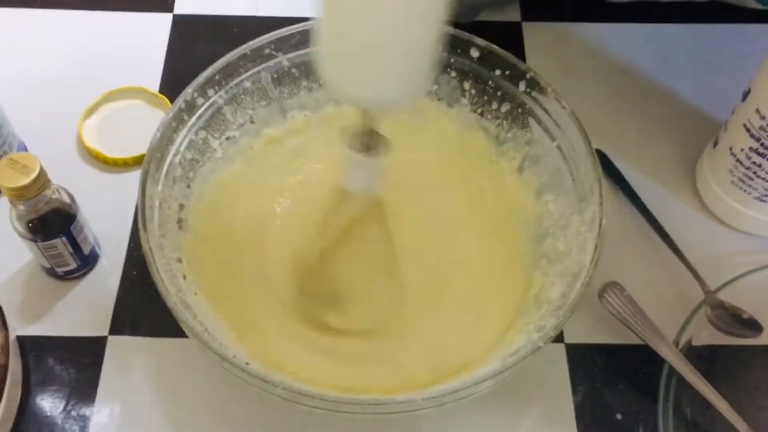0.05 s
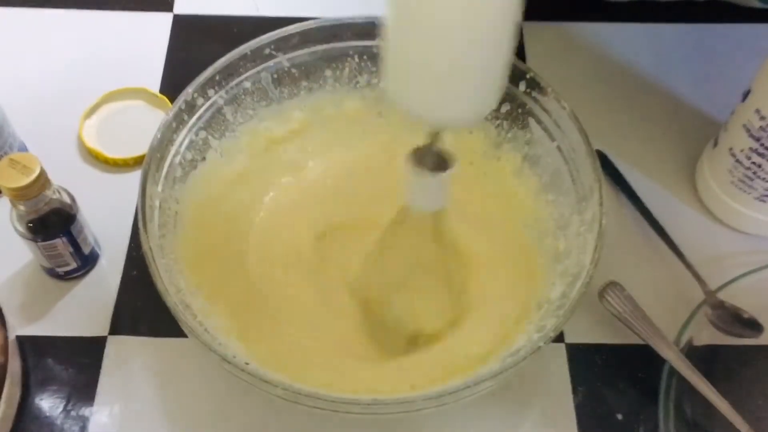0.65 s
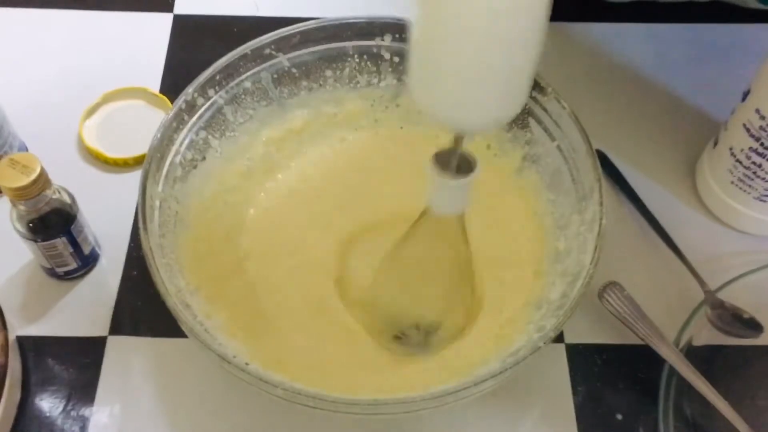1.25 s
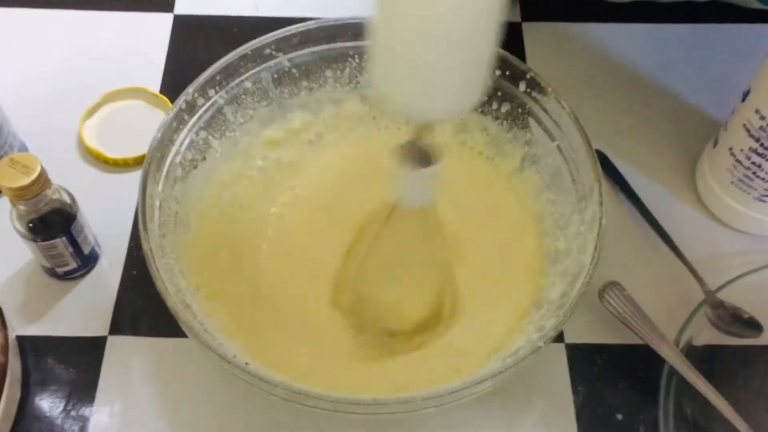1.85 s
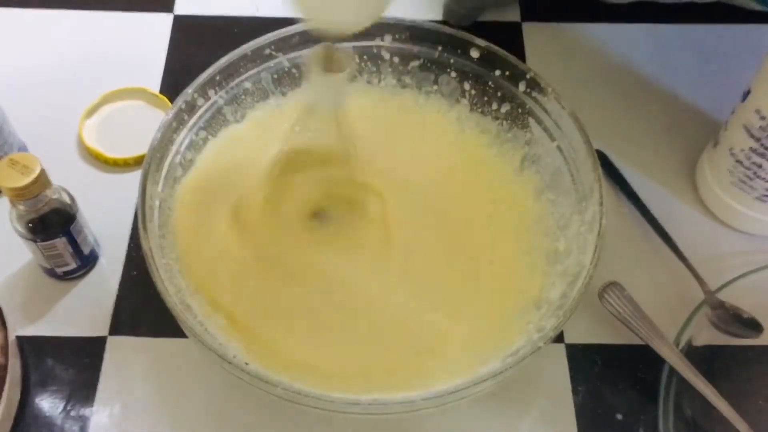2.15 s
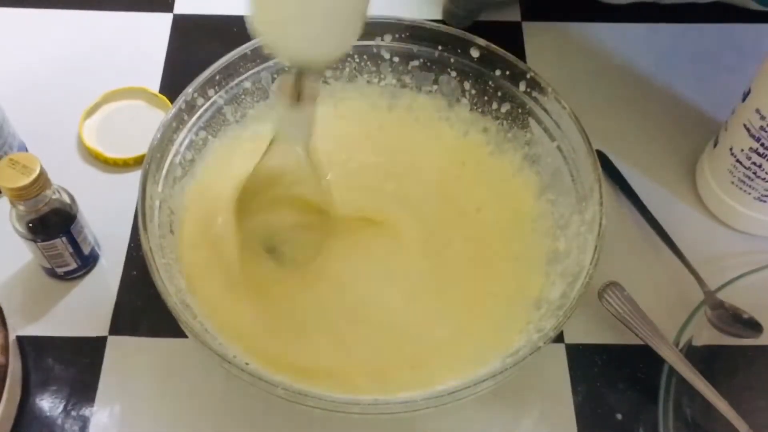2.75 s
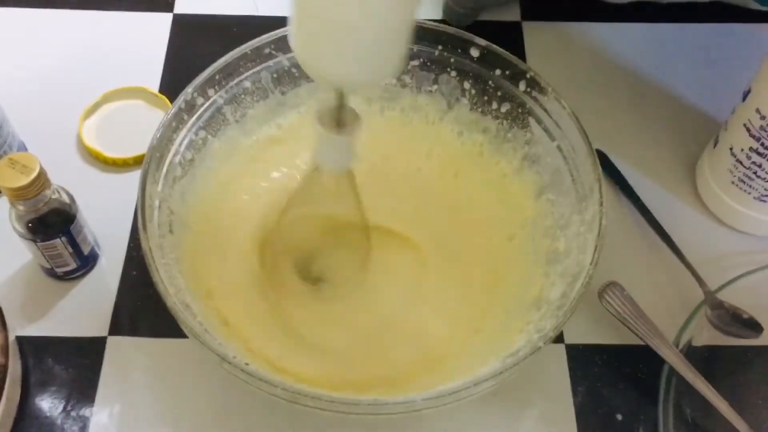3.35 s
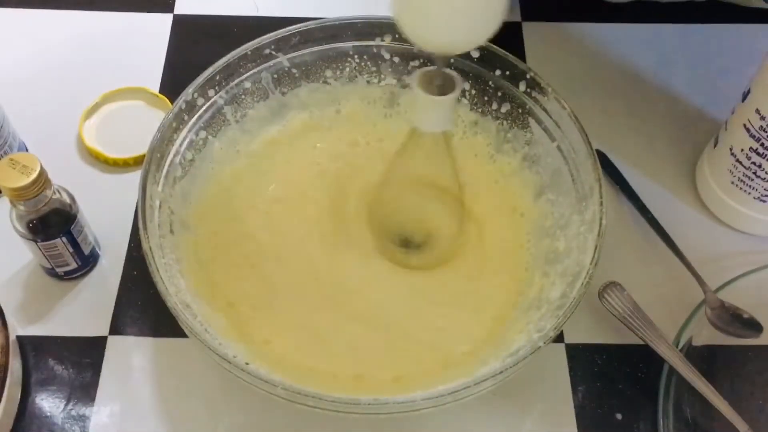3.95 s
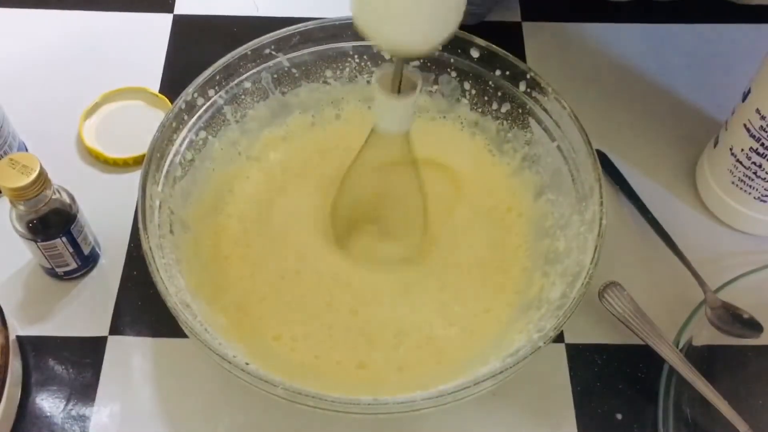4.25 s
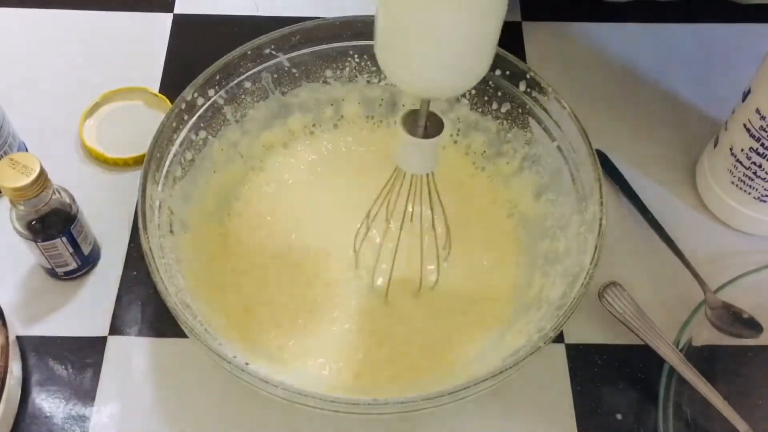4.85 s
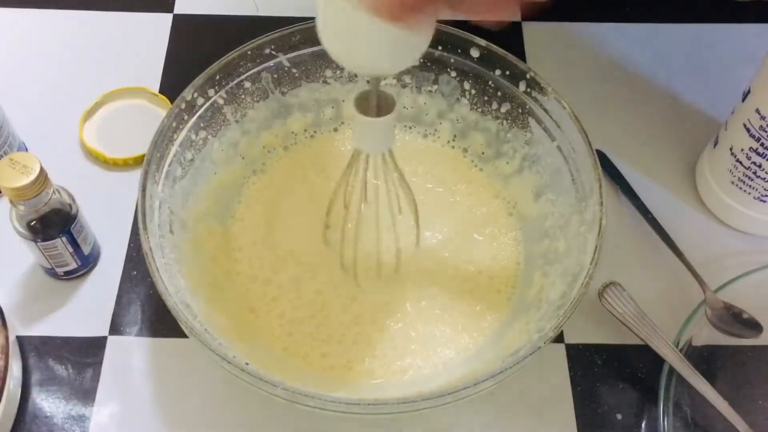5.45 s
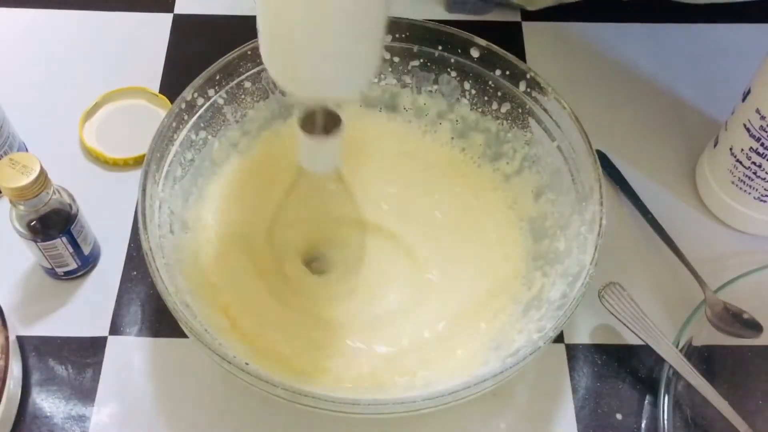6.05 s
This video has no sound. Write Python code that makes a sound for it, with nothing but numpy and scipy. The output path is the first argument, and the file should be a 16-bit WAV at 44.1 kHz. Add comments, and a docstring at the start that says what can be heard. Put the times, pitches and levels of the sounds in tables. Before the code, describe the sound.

Close up in a small kitchen with hard walls, a handheld electric whisk beats batter with a buzzing, rattling whine that wavers as it is stirred around. The bowl rumbles softly underneath. The whisk slows with a falling, shuddering whine and stops, leaving a low hum and barely audible froth. With a sharp click it jumps back to full speed, and a wire squeaks briefly against the glass.

```python
"""On a kitchen counter, a hand blender spins a balloon whisk in a bowl of batter, stops and restarts.
Its reduction gear whines at the tooth rate and its octave, while the impacts of uneven teeth drive
the resonances of the plastic housing, in nearly the same pattern on every whisk turn.
Churned batter shakes the bowl, froth crackles, and the wires click and squeak against the glass.
A mains hum fills the pause, and the small hard room reverberates."""
import sys
import numpy as np
from scipy import signal
from scipy.fft import rfft, irfft, next_fast_len
from scipy.io import wavfile

SR = 44100
rng = np.random.default_rng(int(sys.argv[2]) if len(sys.argv) > 2 else 0)


def store_wav(level_fs):
    """Save 16-bit WAV to argv[1]."""
    pcm = np.round(np.clip(np.atleast_2d(level_fs), -1, 1) * 32767)
    wavfile.write(sys.argv[1], SR, pcm.T.astype(np.int16))


N = 273861
TAPS, TOP_HZ = 2048, 15750
TIME = np.arange(N) / SR
FREQ = np.arange(TAPS + 1) * SR / (2 * TAPS)
HUM_HZ = 58.25
TEETH, RUN_TURNS_PER_S = 143, 17.99
OFF_S, COAST_S = 4.178, .485
ON_S, SPIN_UP_S, SPIN_UP_SHAPE = 5.486, .0275, .87
STROKE_S, OCTAVE_LAG_S = .25, .09
RAISED_S, RAISED_LENGTH_S = 3.9, .42  # half out of the batter, the whisk rattles more brightly

# Spectrum of the still kitchen air: frequency_hz, gain_db
AIR_SPECTRUM = [(30, -3), (160, -3.5), (280, -6), (600, -9), (1000, -10.5), (1500, -15), (2200, -14),
                (3000, -23.5), (7000, -32.5), (15000, -46.5)]
# Swelling and sinking of the mains hum, in relative levels: time_s, fundamental_db, octave_db
HUM_ENVELOPE = [(.3, -50, -45.5), (1.4, -43, -45), (2.2, -42, -48), (2.7, -47.5, -41.5), (4.8, -48, -42.5),
                (5.35, -41.5, -45.5), (6.2, -45, -40.5)]
# Faint upper tones of the hum: pitch_hz, relative_db
HUM_PARTIALS = [(232, -63), (366, -66.5)]
# Spectrum of the shaken bowl and counter: frequency_hz, gain_db
BOWL_SPECTRUM = [(20, -36), (45, -17), (65, -14), (100, -.5), (122, -5.5), (155, -29), (300, -33.5),
                 (900, -68)]
# Batter slopping against the bowl: peak_s, relative_db, length_s
BATTER_SLOPS = [(.13, -37.5, 0.12), (.6, -41, 0.4), (1.23, -37.5, 0.22), (1.64, -42, .12), (1.9, -38.5, .2),
                (2.42, -41, .14), (2.91, -39.5, .12), (3.15, -48, .2), (3.47, -42, .13), (3.95, -44.5, .12),
                (4.8, -52, .07)]
# Flurries of froth round the resting whisk: peak_s, level_db, length_s
FROTH_FLURRIES = [(5.035, -70, 0.035), (5.19, -69, 0.049), (5.31, -71, 0.064)]
# A wire grazing the glass: peak_s, pitch_hz, level_db, length_s
WIRE_GRAZES = [(4.39, 4150, -26, 0.011), (6.035, 8560, -21, 0.016)]
# Knocks of the wires, the switch and gears taking up slack: start_s, level_db, ring_hz, decay_s
IMPACTS = [(4.768, -54, 9500, .007), (4.936, -57, 3300, .004), (5.281, -54, 3000, .004),
           (5.483, -24.5, 2760, 0.006), (5.495, -25, 930, 0.0039)]
# Thin whirr as the whisk is raised: time_s, level_db
WHIRR_ENVELOPE = [(3.3, -60), (3.65, -37), (4.05, -30), (4.25, -40.5), (4.5, -52), (4.6, -100)]
# Broad response of the plastic housing: frequency_hz, gain_db
HOUSING_SPECTRUM = [(120, -20), (330, -23), (450, -12), (550, -10.5), (660, -5), (850, -7), (1000, -8),
                    (1400, -7), (1700, -0.5), (3000, -6), (4500, -3.5), (6200, -4), (9000, -2),
                    (10200, -9.5), (13000, -16), (15500, -21.5)]
# Resonances of the housing: centre_hz, width_hz, lift_db
HOUSING_MODES = [(222, 29, 8.5), (1188, 200, 4), (1964, 304, 9.5), (2317, 340, 10.5), (2690, 220, 4.5),
                 (3460, 1120, 6), (5277, 690, 5.5), (6880, 210, 4), (8386, 680, 5)]
# Stirring strokes that press the gears: peak_s, pressure_fraction, octave_lift_db
STIR_STROKES = [(.03, 0.8, 2.5), (.54, 0.8, 4), (1.08, 0.99, 4), (1.67, 0.83, 2), (2.22, .9, 0.5),
                (2.81, 0.97, 3), (3.34, 0.8, 3.5), (4.12, 0.65, -1.5), (5.68, 0.7, -1), (5.98, 0.8, 1.5)]
# Shudders of the shaft as speed changes: peak_s, length_s, rattle_lift_db, tone_lift_db, octave_lift_db
SHAFT_SHUDDERS = [(4.23, 0.052, -0.5, 3, -1), (4.281, .04, 2.5, -1, 9), (4.366, 0.048, 0.5, 6, 11),
                  (4.452, 0.042, 5, 16, 14.5), (4.495, 0.036, 5, 2.5, -3), (4.53, 0.076, 2.5, 10.5, 14.5),
                  (4.598, 0.045, 2.5, -4, 9), (5.497, .01, 1.5, 9, 2), (5.518, 0.016, 0, 7.5, 7.5)]
# Tones of the uneven gear wheel: cycles_per_turn, relative_db
WHEEL_ORDERS = [(24, -61), (26, -57.5), (37, -54), (47, -53), (49, -53.5), (108, -41), (111, -42),
                (122, -40.5), (129, -44), (133, -35.5), (156, -44.5)]
# Overtones of the unloaded gears and motor: tooth_rate_multiple, relative_db
FREE_OVERTONES = [(3, -5.5), (4.2, -13), (6.4, -14), (8.5, -18), (10.6, -17), (12.7, -19)]


def undb(db):
    """Amplitude ratio of a level in decibels."""
    return 10 ** (np.asarray(db) / 20)


def unit(x):
    """Normalisation to rms 1."""
    return x / np.sqrt(np.mean(x ** 2))


def curve(rows, column=1):
    """Linear interpolation of one table column over time."""
    rows = np.asarray(rows)
    return np.interp(TIME, rows[:, 0], rows[:, column])


def swell(peak_s, length_s):
    """Gaussian envelope of height 1, above one half for length_s."""
    return .5 ** ((2 * (TIME - peak_s) / length_s) ** 2)


def swells(rows):
    """Superposition of Gaussian envelopes: peak_s, level_db, length_s."""
    return sum(undb(db) * swell(peak_s, length_s) for peak_s, db, length_s in rows)


def walk(rate_hz):
    """Band-limited random fluctuation of rms 1, with about rate_hz new values a second."""
    steps = rng.standard_normal(N // 32)[:int(rate_hz * N / SR) + 4]
    smooth = signal.resample_poly(steps, 8, 1)
    return unit(np.interp(TIME * rate_hz * 8, np.arange(len(smooth)), smooth))


def per_turn(turns, count):
    """Periodic modulation: count harmonics of the rotation, complex, with a real part of rms 1."""
    harmonics = np.exp(2j * np.pi * rng.random(count))
    profile = signal.hilbert(unit(irfft(np.r_[0, harmonics], TAPS)))
    return profile[(turns * TAPS).astype(int) % TAPS]


def spectrum(points):
    """Frequency response in dB, interpolated on a logarithmic frequency axis."""
    hz, db = np.transpose(points)
    return np.interp(np.log(FREQ + 1), np.log(hz), db)


def colour(x, db):
    """Minimum-phase filtering with the given response in dB."""
    cepstrum = irfft(db * np.log(10) / 20)
    cepstrum[1:TAPS] *= 2
    cepstrum[TAPS + 1:] = 0
    impulse_response = irfft(np.exp(rfft(cepstrum)))[:TAPS]
    return signal.oaconvolve(x, impulse_response)[:len(x)]


def lowpass(x, hz):
    """First-order low-pass filtering."""
    return signal.lfilter(*signal.butter(1, hz, fs=SR), x)


def background(waver_db=1.45, drift_rad=.3, hum_lift_db=.5, air_db=-53):
    """Superposition: mains hum, wavering in level and phase, over the broadband noise of the air."""
    tones = [(HUM_HZ, curve(HUM_ENVELOPE)), (2 * HUM_HZ, curve(HUM_ENVELOPE, column=2))] + HUM_PARTIALS
    hum = 0
    for hz, db in tones:
        amplitude = np.sqrt(2) * undb(db + hum_lift_db + waver_db * walk(3.5))
        hum += amplitude * np.sin(2 * np.pi * hz * TIME + drift_rad * walk(1.6))
    air = unit(colour(rng.standard_normal(N), spectrum(AIR_SPECTRUM)))
    return hum + air * undb(air_db + .7 * walk(2.9))


def room(x, wet_db=-8, low_t60_s=.69, high_t60_s=.38, split_hz=3000, onset_s=.0095):
    """Reverberation: hard walls return a dense, exponentially decaying tail whose treble dies first."""
    age = TIME[:SR // 2]
    noise = rng.standard_normal(len(age))
    low = lowpass(noise, split_hz)
    tail = low * undb(-60 * age / low_t60_s) + (noise - low) * undb(-60 * age / high_t60_s)
    tail = unit(tail * np.clip(age / onset_s, 0, 1)) / np.sqrt(len(age))
    return x + undb(wet_db) * signal.oaconvolve(x, tail)[:N]


def bowl(slop_lift_db=2.5, steady_db=-54):
    """Forced vibration: churned batter shakes bowl and counter; steady rumble and slops add in power."""
    rumble = unit(colour(rng.standard_normal(N), spectrum(BOWL_SPECTRUM)))
    return rumble * np.hypot(undb(steady_db), undb(slop_lift_db) * swells(BATTER_SLOPS))


def froth(pops_per_s=2500, spread_db=2, highpass_hz=2500, steady_db=-76):
    """Shot noise: tiny air bubbles burst independently on the batter and merge into a soft crackle."""
    pops = (rng.random(N) < pops_per_s / SR) * undb(spread_db * rng.standard_normal(N))
    return unit(pops - lowpass(pops, highpass_hz)) * (undb(steady_db) + swells(FROTH_FLURRIES))


def grazes():
    """Frictional excitation: a wire grazing the glass sings a brief pure tone."""
    return sum(np.sqrt(2) * undb(db) * swell(peak_s, length_s) * np.sin(2 * np.pi * hz * TIME)
               for peak_s, hz, db, length_s in WIRE_GRAZES)


def clicks(half_width_octaves=.99):
    """Impact excitation: each hard contact is a burst that decays in a broad, damped resonance."""
    out = np.zeros(N)
    for start_s, db, hz, decay_s in IMPACTS:
        detuning = np.log2((FREQ + 1) / hz) / half_width_octaves
        ring = unit(colour(rng.standard_normal(TAPS), -10 * np.log10(1 + detuning ** 4)))
        first = int(start_s * SR)
        out[first:first + TAPS] += undb(db) * ring * np.exp(-TIME[:TAPS] / decay_s)
    return out


def whirr(centre_hz=6900, width_hz=330):
    """Narrow-band noise, heard as a thin high whirr while the whisk is raised."""
    band_db = -10 * np.log10(1 + (2 * (FREQ - centre_hz) / width_hz) ** 4)
    return unit(colour(rng.standard_normal(N), band_db)) * undb(curve(WHIRR_ENVELOPE))


def motor_speed(wander=.001602, wander_hz=4):
    """Whisk turns per second: friction slows the idle motor evenly; power brings it quickly back."""
    coast = np.clip(1 - (TIME - OFF_S) / COAST_S, 0, 1)
    run_up = 1 - np.exp(-(np.maximum(TIME - ON_S, 0) / SPIN_UP_S) ** SPIN_UP_SHAPE)
    return RUN_TURNS_PER_S * (coast + run_up) * (1 + wander * walk(wander_hz))


def tooth_force_db(speed, torque_db=13):
    """Contact force is proportional to speed; the motor's torque adds to it during acceleration."""
    share = np.maximum(speed / RUN_TURNS_PER_S, .01)
    return 20 * np.log10(share) + torque_db * (1 - share) * (TIME > ON_S)


def pressure():
    """Mechanical loading of the gears by the stirring hand, from 0 to 1."""
    return sum(press * swell(peak_s, STROKE_S) for peak_s, press, _ in STIR_STROKES)


def shudder_db(column):
    """Transient vibration of the whisk on its shaft shifts the level of one layer."""
    return sum(row[column] * swell(row[0], row[1]) for row in SHAFT_SHUDDERS)


def housing_db():
    """Frequency response of the housing: resonance peaks on a broad contour."""
    peaks = sum(db * .5 ** ((2 * (FREQ - hz) / width) ** 2) for hz, width, db in HOUSING_MODES)
    return spectrum(HOUSING_SPECTRUM) + peaks


def wheel_tones(turns, load, sway_rad=.8, sway_hz=8, flicker_db=3, press_db=2, gain_db=-2.5):
    """Rotational harmonics: the loaded, uneven wheel sounds wavering multiples of the turn rate."""
    tones = 0
    for order, db in WHEEL_ORDERS:
        amplitude = np.sqrt(2) * undb(db + flicker_db * walk(sway_hz))
        tones += amplitude * np.sin(2 * np.pi * order * turns + sway_rad * walk(sway_hz))
    return tones * load * undb(gain_db + press_db * pressure())


def tooth_knocks(turns, memory=.9, uneven_db=2, play_teeth=.3346, slip_teeth=.027):
    """Quasi-periodic impacts: each tooth's strength and offset drift slowly as the whisk is moved."""
    count = int(turns[-1] * TEETH)
    chance = rng.standard_normal((count // TEETH + 1, TEETH, 3))
    chance[1:] *= np.sqrt(1 - memory ** 2)
    pattern = signal.lfilter([1], [1, -memory], chance, axis=0)  # correlated from turn to turn
    offset, strength, flank = pattern.reshape(-1, 3)[:count].T
    place = np.arange(count) + play_teeth * offset + slip_teeth * rng.standard_normal(count)
    arrival = np.interp(place / TEETH, turns, np.arange(N))
    # backlash: a tooth lands on its front or its rear flank
    size = undb(uneven_db * strength) * np.tanh(2 * flank)
    # windowed sinc pulses place the knocks between samples
    taps = arrival.astype(int)[:, None] + np.arange(-5, 7)
    lag = taps - arrival[:, None]
    pulses = size[:, None] * np.sinc(lag) * np.cos(np.pi * lag / 12) ** 2
    return unit(np.bincount(taps.ravel() % N, pulses.ravel(), N))


def rattle(turns, speed, gain_db=-21.5, rub_db=-1, wobble_db=1.27,
           shelf_hz=5000, shelf_db=-1.5, press_db=2, slow_db=12, raised_db=1):
    """Source and filter: knocks and rubbing ring the housing; pressed or slow teeth sound duller."""
    force = tooth_knocks(turns) + undb(rub_db) * rng.standard_normal(N)
    # the whisk runs a little off centre and presses the gears unevenly
    force *= undb(wobble_db * per_turn(turns, count=6).real)
    body = unit(colour(force, housing_db()))
    lows = signal.sosfiltfilt(signal.butter(2, shelf_hz, fs=SR, output="sos"), body)
    bright_db = raised_db * swell(RAISED_S, RAISED_LENGTH_S)
    coast_db = slow_db * (1 - speed / RUN_TURNS_PER_S) ** 2 * (TIME < ON_S)
    lows_db = shelf_db + press_db * pressure() - bright_db + coast_db
    level_db = gain_db + tooth_force_db(speed) + bright_db + shudder_db(column=2)
    return (body + (undb(lows_db) - 1) * lows) * undb(level_db)


def tooth_tone(turns, speed, load, gain_db=-30, load_db=-8.5, press_db=6, body_share=.71,
               runout_rad=.32, flutter_rad=.45, flutter_hz=130, sway_rad=.96, sway_hz=9,
               throb_db=5.5, chatter_db=3, free_chatter_db=1.5, chatter_hz=90):
    """Gear-mesh tone: run-out modulates phase and level on every turn; backlash makes it chatter."""
    bend = runout_rad * per_turn(turns, count=11).real + flutter_rad * walk(flutter_hz)
    bend += sway_rad * walk(sway_hz)  # the hand carries the blender to and fro
    ripple_db = throb_db * load * per_turn(turns, count=3).real
    ripple_db += (chatter_db + free_chatter_db * (1 - load)) * walk(chatter_hz)
    # the tone swells as it glides through the resonances of the housing
    body_db = body_share * np.interp(TEETH * speed, FREQ, housing_db())
    loaded_db = load * (load_db + press_db * pressure())
    level_db = gain_db + tooth_force_db(speed) + body_db + loaded_db + shudder_db(column=3)
    return np.sqrt(2) * undb(level_db + ripple_db) * np.sin(2 * np.pi * TEETH * turns + bend)


def tooth_octave(turns, speed, load, gain_db=-33, load_db=.2, pulse_db=2.46, body_share=.29,
                 runout=.47, flutter=.79, free_flutter=.6, flutter_hz=680, waver_rad=1.5, waver_hz=90):
    """Second mesh harmonic and overtones: joint amplitude and phase modulation adds upper sidebands."""
    phase = 2 * np.pi * TEETH * turns
    tooth_hz = TEETH * speed
    shake = 1 + load * runout * per_turn(turns, count=9)
    flutter_depth = flutter * (load + free_flutter * (1 - load))
    shake += flutter_depth * signal.hilbert(walk(flutter_hz), next_fast_len(N))[:N]
    body_db = body_share * np.interp(2 * tooth_hz, FREQ, housing_db())
    octave = np.exp(1j * (2 * phase + waver_rad * walk(waver_hz))) * undb(body_db + shudder_db(column=4))
    overtones = sum(undb(db) * np.exp(1j * k * phase) * (k * tooth_hz < SR / 2)
                    for k, db in FREE_OVERTONES)
    whine = np.imag((octave + (1 - load) * overtones) * shake)
    stroke_db = sum(db * swell(peak_s + OCTAVE_LAG_S, STROKE_S) for peak_s, _, db in STIR_STROKES)
    loaded_db = load * (pulse_db * np.cos(2 * np.pi * turns) + load_db + stroke_db)
    return np.sqrt(2) * whine * undb(gain_db + tooth_force_db(speed) + loaded_db)


def blender(stop_s=4.615, fade_s=.014, restart_s=5.494, attack_s=.003):
    """Gear noise: one rotation drives rattle and whine, so they slow, stop and restart together."""
    speed = motor_speed()
    turns = np.cumsum(speed + 1e-6) / SR
    # the batter loads the gears fully only near top speed
    load = np.clip(1 - 10 * (1 - speed / RUN_TURNS_PER_S), 0, 1)
    stopping = np.exp(-np.maximum(TIME - stop_s, 0) / fade_s)
    restarting = np.clip((TIME - restart_s) / attack_s + 1, 0, 1)
    gears = rattle(turns, speed) + tooth_tone(turns, speed, load)
    gears += tooth_octave(turns, speed, load) + wheel_tones(turns, load)
    return np.maximum(stopping, restarting) * gears


def scene():
    """Superposition of all sources at one point above the bowl, alike in both channels."""
    mono = room(blender() + whirr() + clicks() + grazes() + froth()) + bowl() + background()
    return np.array([mono, mono])


def record(dry):
    """Band limiting: a steep elliptic low-pass removes the highest treble."""
    return signal.sosfilt(signal.ellip(10, .1, 80, TOP_HZ, fs=SR, output="sos"), dry)


dry = scene()
out = record(dry)
store_wav(out)
```